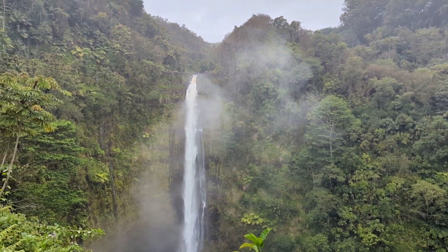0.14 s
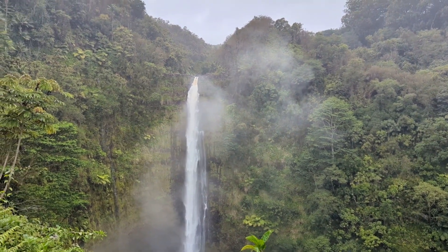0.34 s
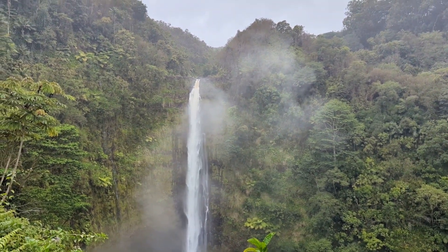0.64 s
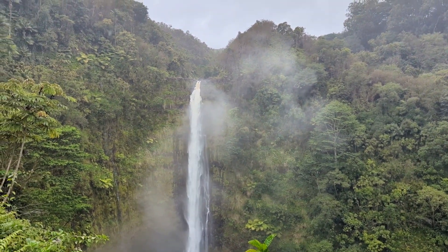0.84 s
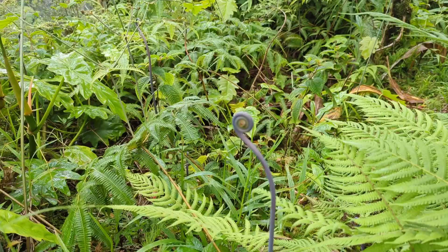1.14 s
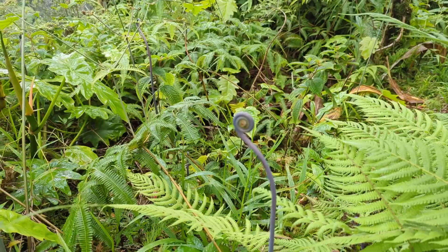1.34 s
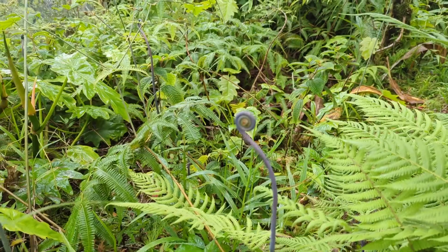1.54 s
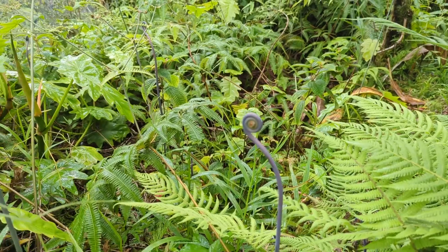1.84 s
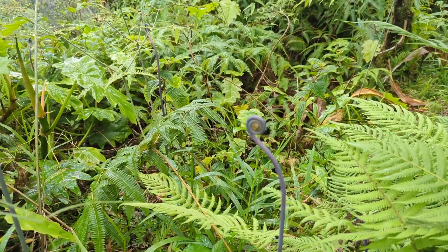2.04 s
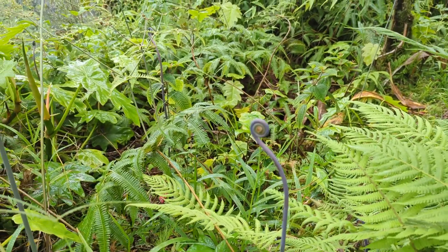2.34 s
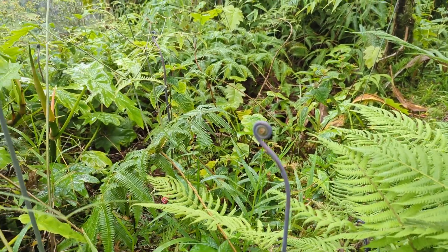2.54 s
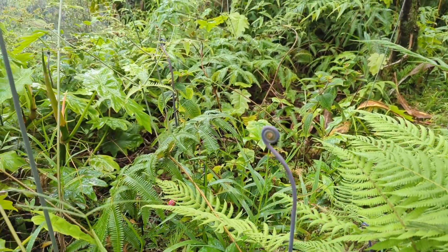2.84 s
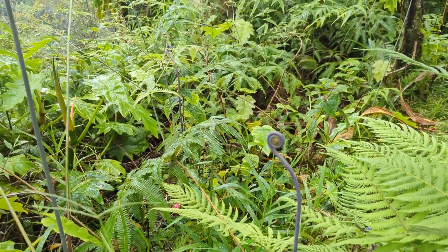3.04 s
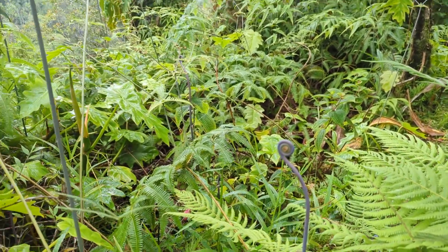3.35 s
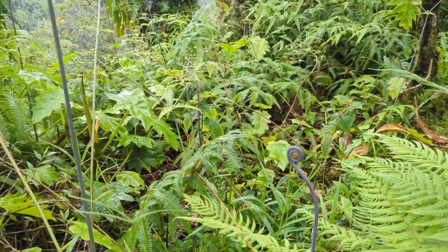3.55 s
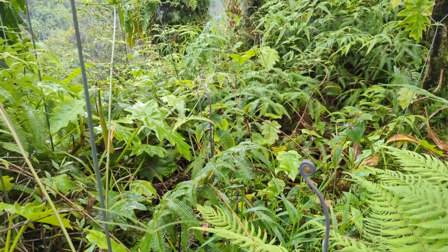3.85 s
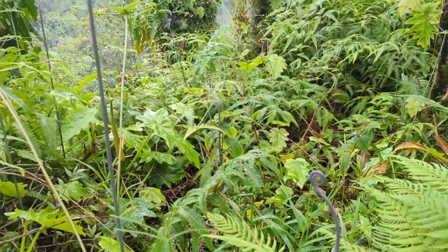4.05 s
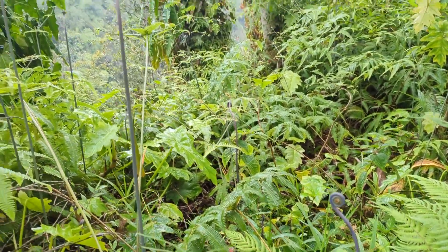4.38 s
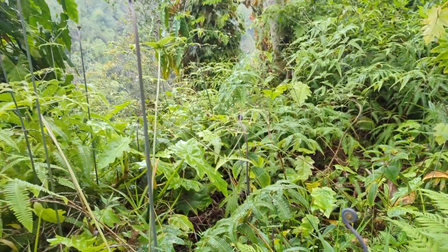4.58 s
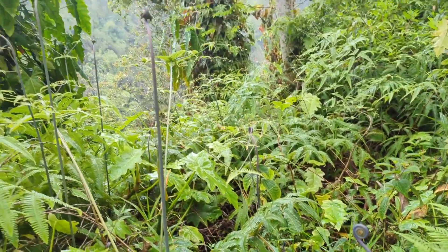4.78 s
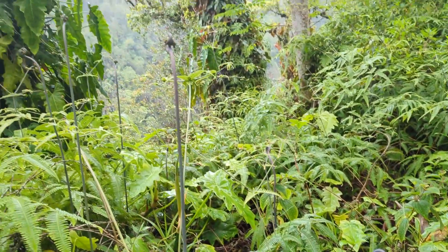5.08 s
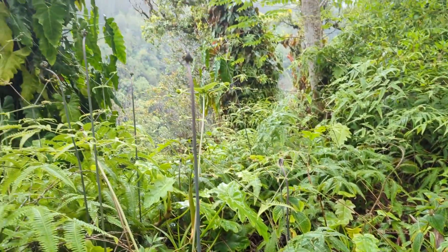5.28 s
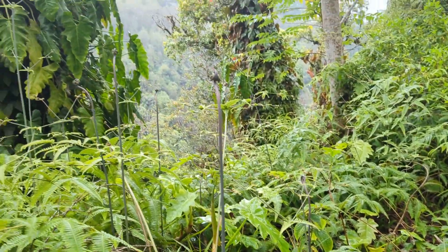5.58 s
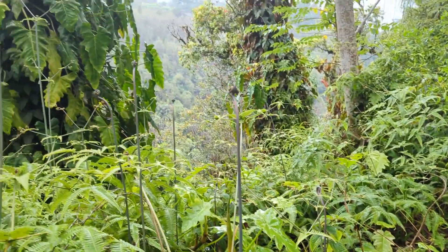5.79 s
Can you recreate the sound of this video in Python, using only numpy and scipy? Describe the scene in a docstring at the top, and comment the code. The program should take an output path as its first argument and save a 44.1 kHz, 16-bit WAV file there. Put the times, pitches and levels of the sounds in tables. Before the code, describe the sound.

A tall waterfall roars close by for a second, stutters off abruptly, then quiet wet forest with low rumble, drips, bird chirps and frog-like notes.

```python
"""A gorge, then deep wet ferns: a tall waterfall roars, then the scene changes; the roar drops out, stutters
once and the ferns fade in. There the falls are a low rumble and a soft hiss under frog notes, a bird, dripping
and rustling leaves. Water and leaves are shaped noise, animal notes are gliding tones, drops are short filtered
bursts. Two microphone ports of a small camera hear it; facing the falls the right one is half covered and rings
near 2.3 kHz."""
import sys
import numpy as np
from scipy import signal
from scipy.fft import rfft, irfft
from scipy.io import wavfile
from scipy.ndimage import uniform_filter1d

SR = 44100
rng = np.random.default_rng(int(sys.argv[2]) if len(sys.argv) > 2 else 0)


def volts_from_db(level):
    """Convert decibel levels to linear amplitude ratios."""
    exponent = np.asarray(level, float) / 20
    return 10 ** exponent


def inscribe(sig):
    """Save sig as 16-bit PCM at rate SR to the path in sys.argv[1].

    A 1-D sig is mono; a 2-D sig holds one channel per row.
    Samples are clipped to [-1, 1] before scaling.
    """
    pcm = np.round(np.clip(np.atleast_2d(sig).T, -1, 1) * 32767)
    wavfile.write(sys.argv[1], SR, pcm.astype(np.int16))


N = 261072

# Colour of the water at the two ports; each band is evened later, so only the balance inside it counts:
# f/Hz, left level/dB per Hz, right level/dB per Hz
FALLS_COLOUR = [(52, -64, -64.5), (118, -61.5, -60), (219, -68.5, -67.5), (386, -66, -66),
                (790, -71.5, -69.5), (1350, -72.5, -65.5), (2260, -75, -54), (3110, -76, -62),
                (4200, -79.5, -78.5), (5870, -85, -95.5), (6450, -79, -92), (7300, -86, -100.9),
                (8560, -84.5, -105.6), (9300, -91.5, -109.9), (9900, -99, -116.1), (11700, -98, -110.0),
                (13500, -103.5, -105.1), (16000, -112.8, -120.6)]
FOREST_COLOUR = [(53, -61, -60.5), (72.6, -69.5, -70), (117, -69, -69), (304, -80.5, -80), (720, -85, -85),
                 (860, -81, -80), (1350, -85.5, -82), (1990, -88.5, -81.5), (2580, -91, -84),
                 (3220, -93, -91), (4480, -100.7, -100), (6100, -105.2, -102.9), (6560, -103.6, -102.5),
                 (8730, -109.4, -108.1), (8930, -113.4, -109.9), (9500, -118.7, -114.9),
                 (11900, -118.1, -113.9), (15700, -127.5, -126.2)]
# How alike the two ports sound: f/Hz, likeness (0 to 1), left ahead of right/rad
FALLS_PORTS = [(50, .93, 0), (220, .76, 0), (400, .93, 0), (1400, .68, 0), (2300, .68, 1.9),
               (3000, .6, 3.8), (4500, .35, 6.3), (5800, .15, 8), (9000, .2, 12), (10000, .03, 12)]
FOREST_PORTS = [(50, .99, 0), (130, .97, 0), (300, .81, .1), (700, .55, .6), (950, .25, 1.8),
                (1500, .46, 3.4), (2600, .1, 7), (9000, .07, 28)]
# Ferns open toward the gorge and let more water sound through: t/s, change of level/dB
FERN_OPENING = [(1.3, 1), (1.65, -2), (2.0, 0), (2.75, 1.5), (3.8, 2), (4.2, 3), (5.06, 3.5), (5.92, 3)]
# Swells of the deep bass, added to its floor: middle t/s, peak level/dB, length/s
BASS_SWELLS = [(.27, -48, .12), (0.39, -46, 0.11), (0.603, -40, .1), (0.778, -36, 0.21), (.91, -41, 0.067),
               (1.055, -43, .08), (1.263, -46, 0.15), (1.59, -48.5, 0.17), (1.745, -40, 0.065),
               (2.014, -44, .07), (2.407, -45.5, .12), (2.558, -36.5, 0.056), (2.827, -42.5, 0.28),
               (3.276, -37, 0.056), (3.397, -41.5, .06), (3.595, -47.5, 0.22), (3.815, -45, 0.31),
               (4.04, -42.5, 0.29), (4.422, -39, 0.061), (4.555, -49, .06), (4.685, -45.5, .08),
               (4.785, -41.5, 0.071), (5.118, -39.5, 0.15), (5.325, -43.5, 0.13), (5.65, -43, 0.15),
               (5.8, -43.5, 0.083)]
# Puffs that stir the leaves, added to their floor: middle t/s, peak level/dB, length/s
LEAF_PUFFS = [(1.3, -81, .15), (1.986, -78, 0.14), (2.3, -86, .06), (2.96, -91, .15), (3.8, -88, .3),
              (4.65, -79.5, 0.44), (5.1, -78, 0.67), (5.5, -85, .3), (5.83, -85, .2)]
# Dull ticks, heavier drops or stems touching: t/s, peak level/dB, left minus right/dB, nominal f/Hz
DULL_TAPS = [(1.2655, -52, -2, 1600), (1.3022, -48.5, -2.5, 1600), (1.3494, -50, -4, 1590),
             (1.5244, -63, -5.5, 1600), (2.7674, -49, -7, 1600), (2.8384, -47, -5.5, 1590)]
# Drops ticking on near leaves: t/s, peak level/dB, left minus right/dB, nominal f/Hz
LEAF_DRIPS = [(1.2785, -52, -.5, 8520), (1.481, -61, 0, 9020), (1.5165, -61, 1.5, 8790),
              (1.8068, -56, -8, 10600), (1.9294, -58, -1, 7680), (1.9764, -58, -1.5, 7500),
              (2.1206, -60, -3.5, 7910), (2.2722, -65, -2.5, 7640), (2.4788, -63, -3, 8520),
              (2.7487, -61, -4, 7880), (2.7677, -52.5, -13, 9960), (2.837, -56, -9, 7880),
              (2.9647, -63, -2.5, 7920), (3.1592, -60.5, -3, 7650), (4.4039, -56, -1, 7700),
              (4.5471, -61, -2, 7670), (4.5665, -60, 0, 8330), (4.8429, -54, -.5, 8210),
              (5.0294, -56, 0, 8060), (5.224, -50, -12, 8300), (5.2969, -64, -1.5, 8950),
              (5.3547, -57, -1, 8730), (5.7778, -60.5, -6, 8630), (5.8252, -58, -10, 8000),
              (5.881, -52, -5, 7570)]
# Notes that glide quickly and then settle; the level is the strongest point before flutter and panning:
# start t/s, length/s, first f/Hz, last f/Hz, level/dB
BIRD_NOTES = [(1.3, .058, 4800, 4700, -74.5), (1.39, .062, 4750, 4050, -71), (1.878, .05, 8000, 8700, -72),
              (1.878, .112, 8300, 6050, -57.5), (1.99, .09, 5350, 4900, -61.5),
              (2.045, .085, 4900, 3800, -63), (2.165, .1, 7150, 5850, -69), (2.257, .065, 4950, 4620, -62),
              (2.29, .095, 4550, 3800, -62)]
FROG_NOTES = [(2.32, 0.05, 1570, 1600, -62), (2.55, 0.13, 2380, 2850, -55.5),
              (2.835, 0.12, 2286, 2914, -55.5), (3.8, 0.053, 1530, 1600, -61.5),
              (4.07, 0.078, 2740, 2890, -61.5), (5.025, 0.07, 1530, 1573, -64.5)]

# Levels in dB, before the bass cut in record()
BOOM_DB, WASH_DB, ROAR_DB = -45.5, -39, -30  # facing the falls: plunge pool floor, low wash, roar
RUMBLE_DB, BODY_DB, HISS_DB = -54.5, -51, -59  # among the ferns; the rumble is a floor
MIST_DB, LEAF_DB = -73.5, -88.5  # among the ferns; the leaves are a floor

# The roar fades out, creeps back, snaps on once more and fades out; times in s
DROP_S, DROP_FADE_S = 1.098, .013
SNAP_S, SNAP_HOLD_S, SNAP_FADE_S = 1.1562, .005, .016
CREEP_LEFT_DB, CREEP_RIGHT_DB, CREEP_BORROWED_DB = -6, -15, -17  # reached just before the snap
SNAP_BORROWED_DB, SNAP_T60_S = 2, .012  # at the snap, then the time to sink 60 dB
FADE_IN_S, FADE_LEFT_S, FADE_RIGHT_S = 1.198, .052, .12  # forest: start, then time to full on each side


def evened(x):
    """Scales a sound to an average strength (rms) of 1."""
    return x / np.sqrt(np.mean(x ** 2) + 1e-20)


def ramp(start_s, length_s):
    """Rises in a straight line from 0 to 1."""
    return np.clip((np.arange(N) / SR - start_s) / length_s, 0, 1)


def swelling(floor_db, rows):
    """A gain that rests on a floor and rises in a smooth hump for every row."""
    t = np.arange(0, N + 64, 64) / SR
    power = volts_from_db(floor_db) ** 2
    for middle_s, db, length_s in rows:
        power = power + volts_from_db(db) ** 2 * np.exp(-8 * ((t - middle_s) / length_s) ** 2)
    return np.interp(np.arange(N) / SR, t, np.sqrt(power))


def low_cut(hz):
    """Gain of the steep bass cut behind the microphone."""
    return 1 / np.sqrt(1 + (45 / (hz + 1)) ** 18)


def spray(patchy_db, flicker_db):
    """Two white noises sharing drifting patches and a wide-band flicker."""
    frame, hop = 1024, 256  # samples
    frames, bins = N // hop + 5, frame // 2 + 1
    a, b, c, d, patches = rng.standard_normal((frames, bins, 5)).T
    # spray drifts in clouds: smooth over pitch, then over time
    patches = uniform_filter1d(patches, 14, 0)
    patches = evened(uniform_filter1d(patches, 10, 1))
    # sheets of water land together
    flicker = evened(uniform_filter1d(rng.standard_normal(frames), 3))
    z = np.array([a + 1j * b, c + 1j * d]) * volts_from_db(patchy_db * patches + flicker_db * flicker)
    return signal.istft(z, nperseg=frame, noverlap=frame - hop)[1][:, :N]


def water(colour, ports, edges_hz, noise):
    """Countless splashes as coloured noise at two ports, cut into bands of unit strength."""
    hz = np.fft.rfftfreq(N, 1 / SR)
    f, *columns = np.transpose(colour)
    left_db, right_db = (np.interp(np.log(hz + 1), np.log(f + 1), c) for c in columns)
    f, *columns = np.transpose(ports)
    same, lead = (np.interp(hz, f, c) for c in columns)
    left, other = rfft(noise)
    # the right port hears a late copy of the left plus noise of its own
    right = same * left * np.exp(-1j * lead) + np.sqrt(1 - same ** 2) * other
    z = np.array([left * volts_from_db(left_db), right * volts_from_db(right_db)]) * low_cut(hz)
    # neighbouring bands cross over within a third of an octave
    above = [np.clip(.5 + 3 * np.log2((hz + 1) / edge), 0, 1) for edge in edges_hz]
    shares = -np.diff([np.ones(len(hz)), *above, np.zeros(len(hz))], axis=0)
    bands = [irfft(z * np.sqrt(share), N) for share in shares]
    return [band / np.std(band.mean(0)) for band in bands]


def steadied(band):
    """A narrow bass band with its own beating mostly flattened, so that added swells stand out."""
    envelope = uniform_filter1d(abs(signal.hilbert(band.mean(0))), SR // 50)
    return evened(band / (envelope + .26))


def falls():
    """The near roar of splashing water; in the dropout the right side borrows the sound of the left."""
    noise = spray(patchy_db=.96, flicker_db=.52)
    boom, wash, roar = water(FALLS_COLOUR, FALLS_PORTS, [72, 300], noise)
    boom = swelling(BOOM_DB, BASS_SWELLS) * steadied(boom)
    left, right = boom + volts_from_db(WASH_DB) * wash + volts_from_db(ROAR_DB) * roar

    since_s = np.arange(N) / SR - SNAP_S
    before_snap = 1 - ramp(DROP_S, DROP_FADE_S)
    after_snap = 1 - ramp(SNAP_S + SNAP_HOLD_S, SNAP_FADE_S)
    full = np.where(since_s < 0, before_snap, after_snap)
    creep = (since_s < 0) * ramp(DROP_S, SNAP_S - DROP_S)
    snap = (since_s > 0) * volts_from_db(SNAP_BORROWED_DB - 60 * abs(since_s) / SNAP_T60_S)
    borrowed = volts_from_db(CREEP_BORROWED_DB) * creep + snap
    return np.array([(full + volts_from_db(CREEP_LEFT_DB) * creep) * left,
                     (full + volts_from_db(CREEP_RIGHT_DB) * creep) * right + borrowed * left])


def forest():
    """The same water heard through foliage, with the uneven rustle of wet leaves on top."""
    noise = spray(patchy_db=1.13, flicker_db=.04)
    edges_hz = [72, 700, 4500, 9600]
    rumble, body, hiss, mist, leaves = water(FOREST_COLOUR, FOREST_PORTS, edges_hz, noise)

    # leaves move in short puffs, drawn once every 100 samples
    rustle = np.minimum(rng.exponential(1, N // 100 + 1), 3) ** 2
    rustle = evened(uniform_filter1d(rustle, 12)) - 1
    rustle = np.interp(np.arange(N) / 100, np.arange(len(rustle)), rustle)

    opening_s, opening_db = np.transpose(FERN_OPENING)
    open_db = np.interp(np.arange(N) / SR, opening_s, opening_db)
    mix = swelling(RUMBLE_DB, BASS_SWELLS) * steadied(rumble)
    mix = mix + volts_from_db(BODY_DB + open_db) * body
    mix = mix + volts_from_db(HISS_DB + open_db) * hiss
    mix = mix + volts_from_db(MIST_DB + open_db + 1.9 * rustle) * mist
    mix = mix + swelling(LEAF_DB, LEAF_PUFFS) * volts_from_db(1.8 * rustle) * leaves
    return np.array([ramp(FADE_IN_S, FADE_LEFT_S), ramp(FADE_IN_S, FADE_RIGHT_S)]) * mix


def add(mix, start_s, sound):
    """Adds a two-sided sound into the mix at its start time."""
    part = mix[:, round(start_s * SR):][:, :sound.shape[1]]
    part += sound[:, :part.shape[1]]


def panned(sound, pan_db):
    """Places a sound between the sides; pan_db is left minus right."""
    return np.array([sound * volts_from_db(pan_db / 2), sound * volts_from_db(-pan_db / 2)])


def tick(hz, t60_s, noise, width):
    """A tiny noise burst around hz with a sharp front and one weaker bounce, peak 1."""
    t = np.arange(len(noise)) / SR
    bounce_s = .0048
    bounce = volts_from_db(-9.5 - 60 * np.maximum(t - bounce_s, 0) / t60_s) * (t > bounce_s)
    edges_hz = [hz / (1 + abs(width) + .055), min(hz * (1 + width), SR / 2.2)]
    band = signal.butter(2, edges_hz, "band", fs=SR, output="sos")
    burst = signal.sosfilt(band, noise * (volts_from_db(-60 * t / t60_s) + bounce))
    return burst / abs(burst).max()


def ticks(rows, t60_s, width):
    """One dying burst for each row of a table; width is a share of the nominal pitch."""
    out = np.zeros((2, N))
    for start_s, db, pan_db, hz in rows:
        noise = rng.standard_normal(4096)
        add(out, start_s, volts_from_db(db) * panned(tick(hz, t60_s, noise, width), pan_db))
    return out


def taps():
    """Heavier drops or stems touching: dull, wide bursts that die more slowly."""
    return ticks(DULL_TAPS, t60_s=.05, width=.89)


def drips():
    """Drops on near leaves: bright, narrower bursts that die at once."""
    return ticks(LEAF_DRIPS, t60_s=.012, width=.39)


def whistle(length_s, first_hz, last_hz, db, settle, peak, edge_db, waver, flutter_db):
    """A near sine that glides, then settles, and wavers slightly in pitch and strength."""
    u = np.arange(0, length_s, 1 / SR) / length_s  # 0 to 1 through the note
    glide = (1 - np.exp(-settle * u)) / (1 - np.exp(-settle))
    hz = first_hz + (last_hz - first_hz) * glide
    from_peak = np.where(u < peak, 1 - u / peak, (u - peak) / (1 - peak))
    level_db = db + edge_db * from_peak ** 2
    drift, flutter = (evened(uniform_filter1d(rng.standard_normal(SR // 4), 200))[:len(u)]
                      for _ in range(2))
    tone = np.sqrt(2) * np.sin(2 * np.pi * np.cumsum(hz * (1 + waver * drift)) / SR)
    return tone * volts_from_db(level_db + flutter_db * flutter) * signal.windows.tukey(len(u), .2)


def calls(notes, pan_db, t60_s, scatter_db, echo_s, **voice):
    """Notes of one animal, followed by echoes scattered off trunks and leaves."""
    direct = np.zeros((2, N))
    for start_s, *note in notes:
        add(direct, start_s, panned(whistle(*note, **voice), pan_db))
    t = np.arange(SR // 2) / SR
    build_up = np.clip(t / echo_s, 0, 1) ** 2
    scatter = rng.standard_normal((2, len(t))) * volts_from_db(-60 * t / t60_s) * build_up
    scatter = scatter / np.linalg.norm(scatter[0])
    return direct + volts_from_db(scatter_db) * signal.fftconvolve(direct, scatter, axes=1)[:, :N]


def bird():
    """Short high gliding tones, strongest past the middle of each note (peak is a share of it)."""
    return calls(BIRD_NOTES, pan_db=-4, t60_s=.16, scatter_db=-2.5, echo_s=.014,
                 settle=1.8, peak=.65, edge_db=-16, waver=.013, flutter_db=3.5)


def frog():
    """Lower gliding tones that settle sooner and are strongest just before the middle of each note."""
    return calls(FROG_NOTES, pan_db=-5, t60_s=.2, scatter_db=0, echo_s=.025,
                 settle=2.8, peak=.45, edge_db=-11, waver=.008, flutter_db=3.5)


def scene():
    """All sounds together, in the order they first appear."""
    return falls() + forest() + taps() + drips() + bird() + frog()


def low_pass(x):
    """Removes everything above the highest recorded frequency."""
    return signal.sosfilt(signal.butter(12, 15870, fs=SR, output="sos"), x)


def record(dry):
    """Takes away the deepest bass, as behind the microphone, and finishes the mix."""
    cut = irfft(rfft(dry) * low_cut(np.fft.rfftfreq(N, 1 / SR)), N)
    return low_pass(cut)


dry = scene()
out = record(dry)
inscribe(out)
```